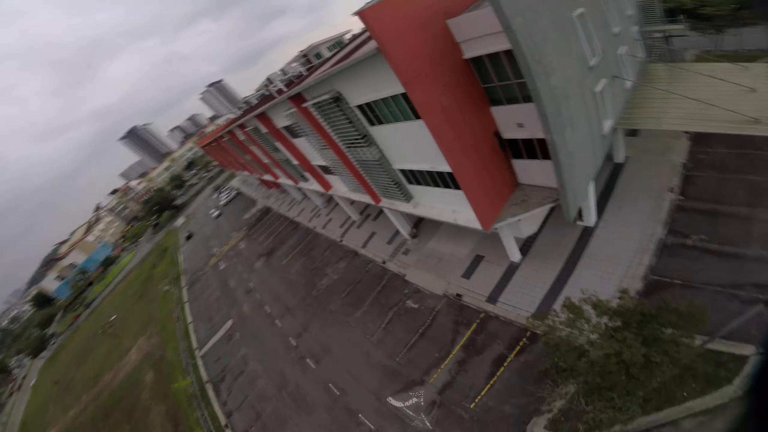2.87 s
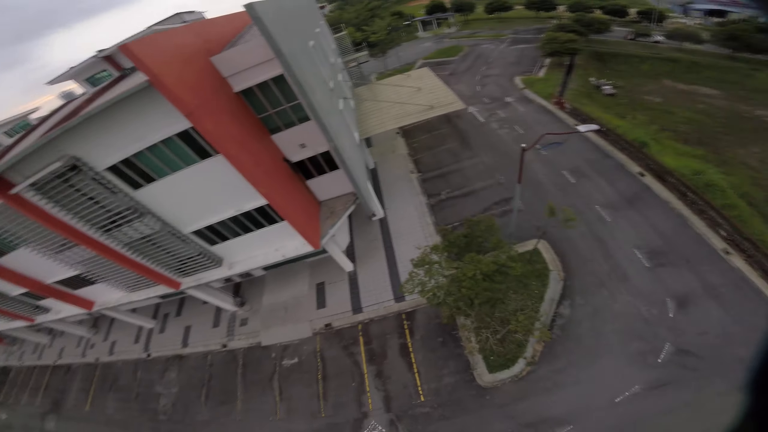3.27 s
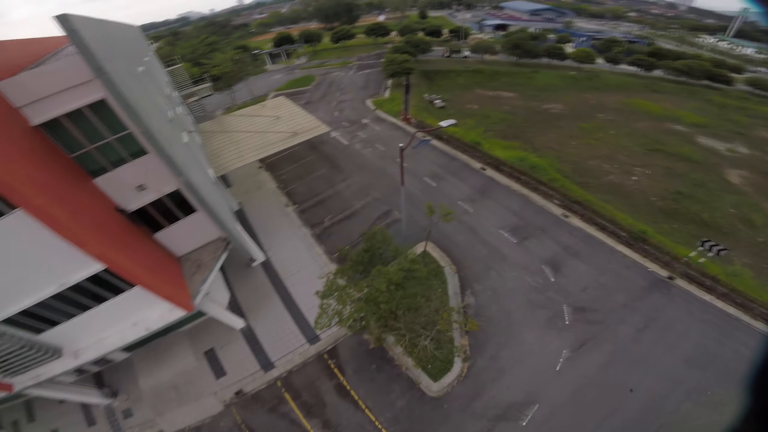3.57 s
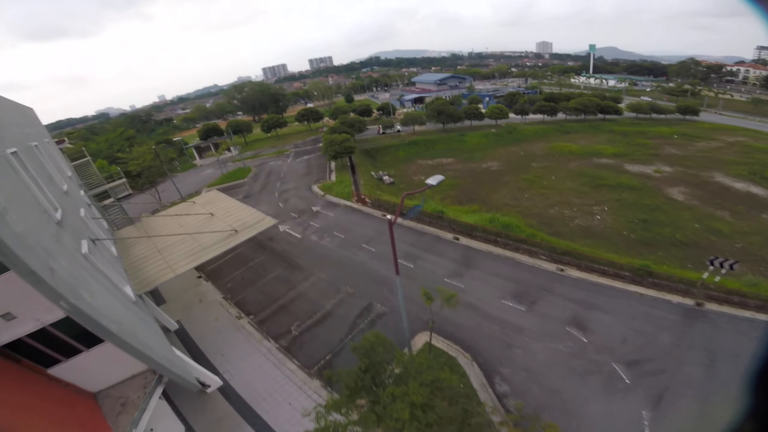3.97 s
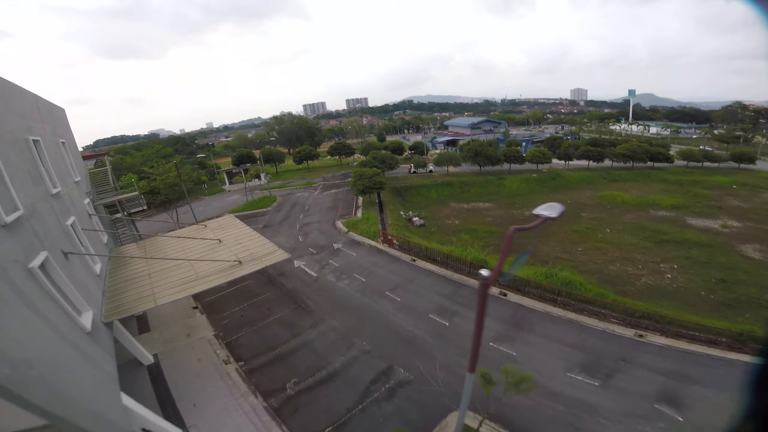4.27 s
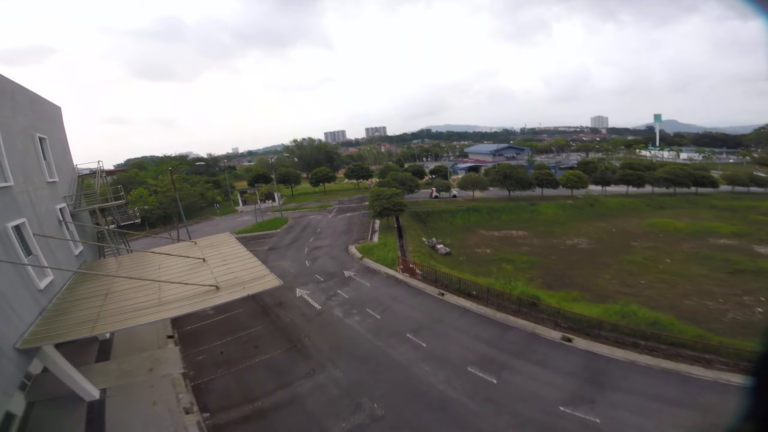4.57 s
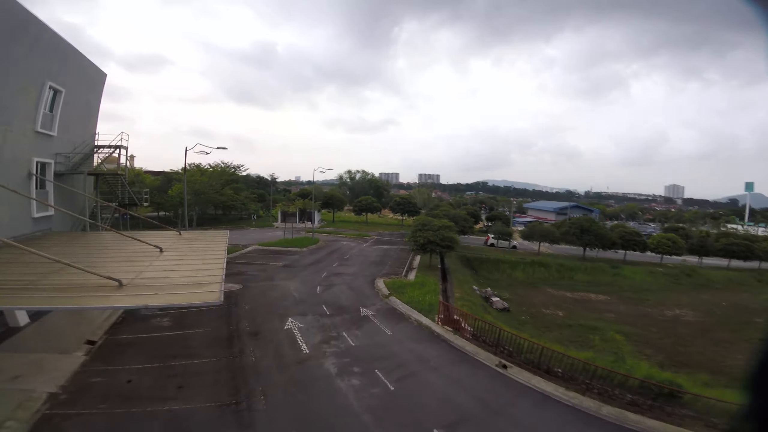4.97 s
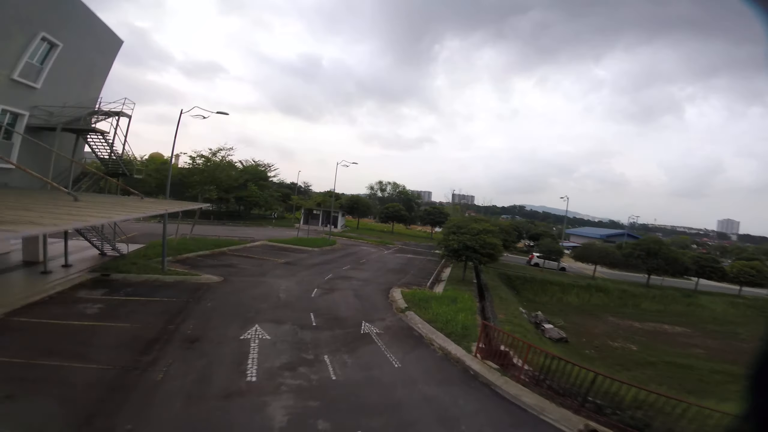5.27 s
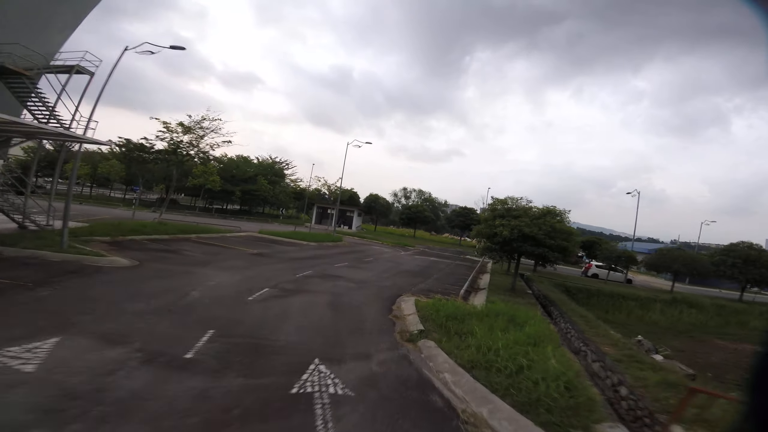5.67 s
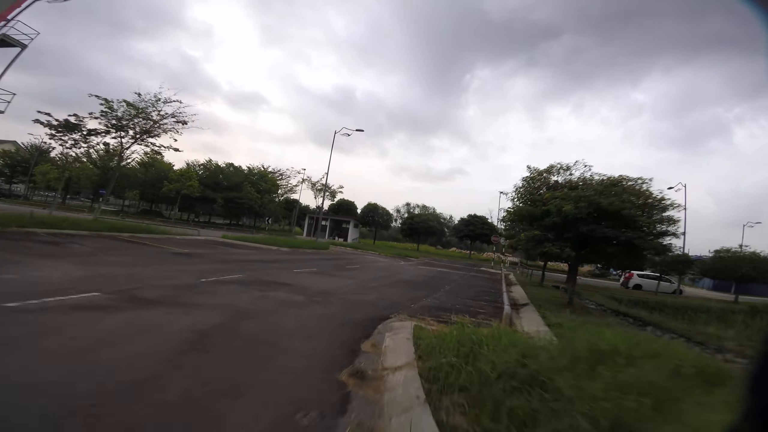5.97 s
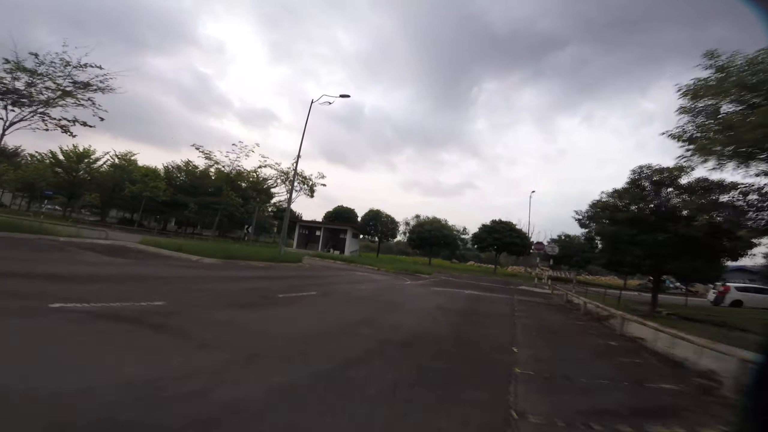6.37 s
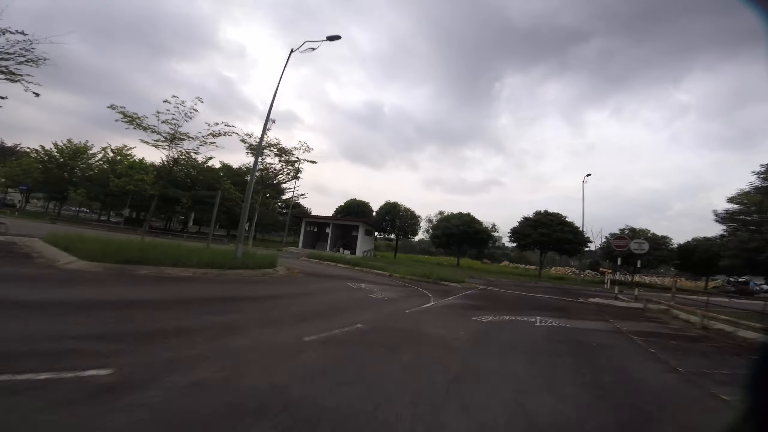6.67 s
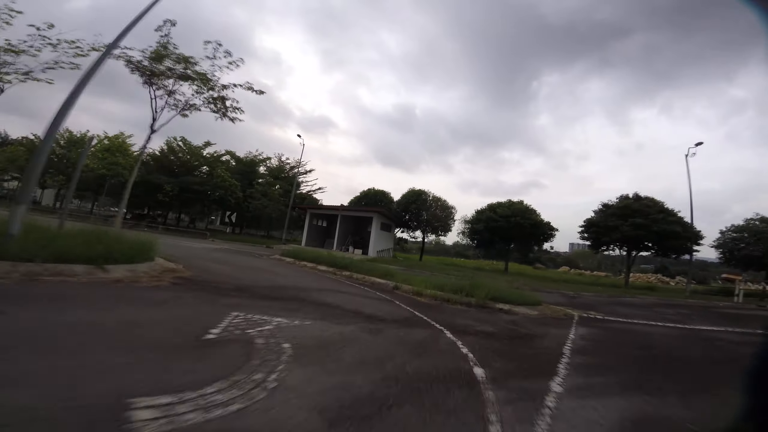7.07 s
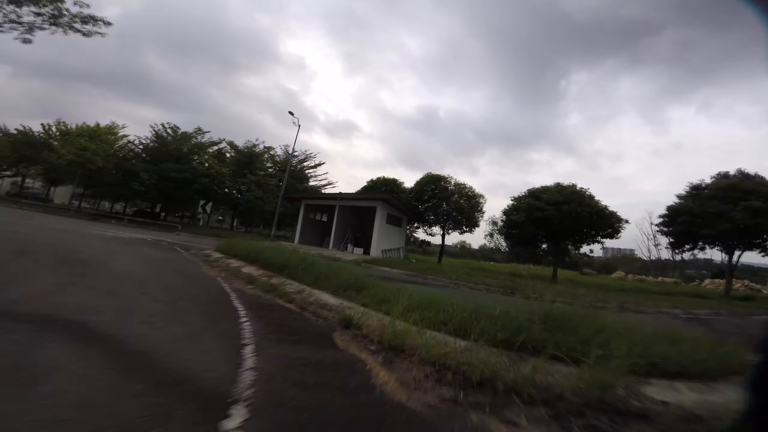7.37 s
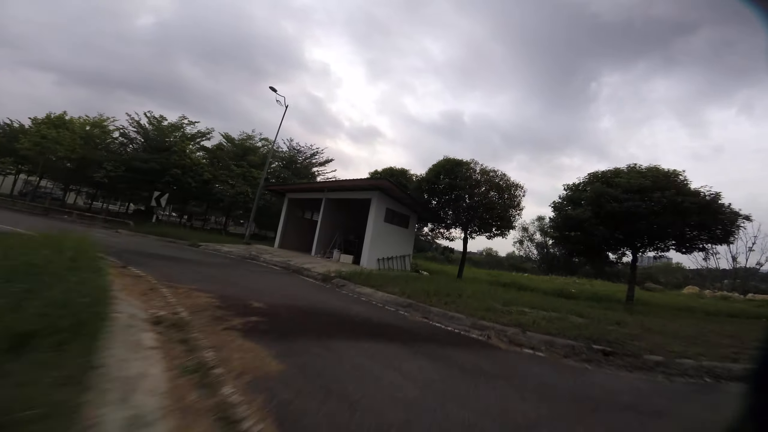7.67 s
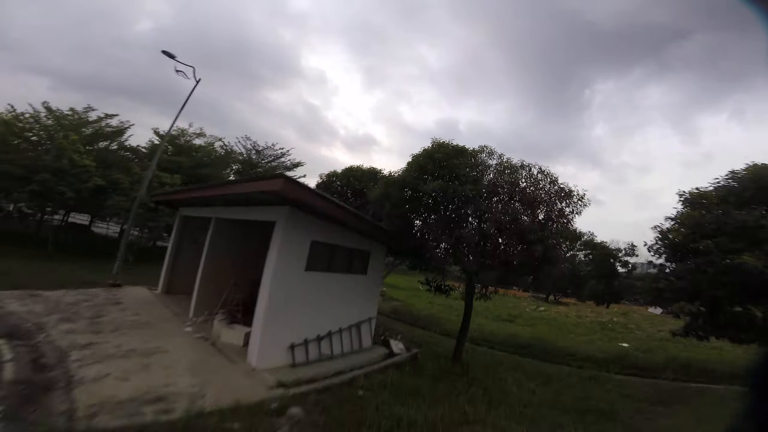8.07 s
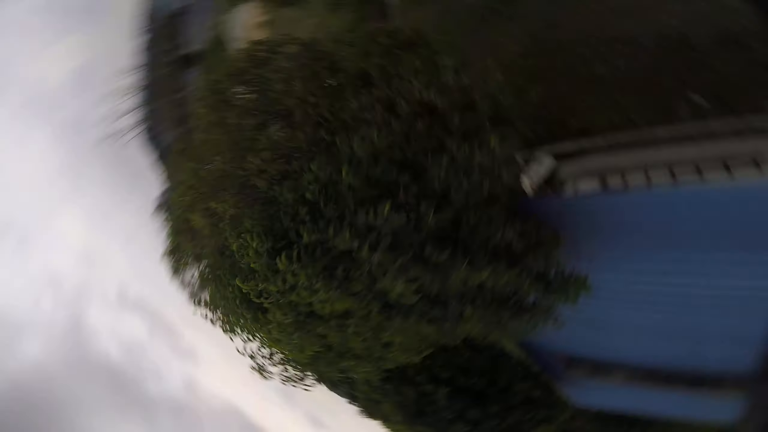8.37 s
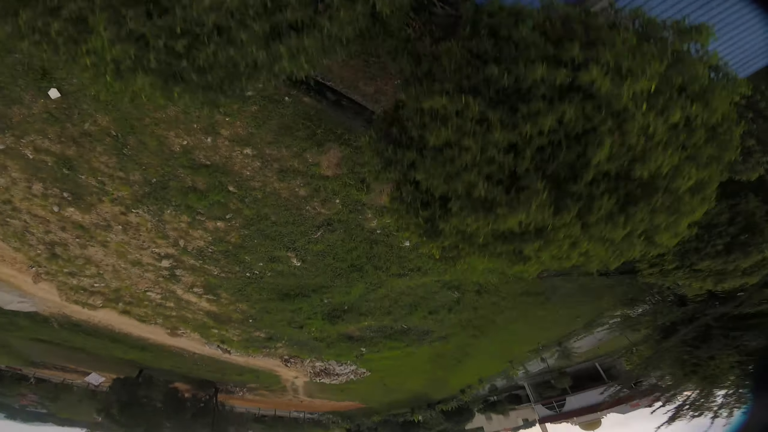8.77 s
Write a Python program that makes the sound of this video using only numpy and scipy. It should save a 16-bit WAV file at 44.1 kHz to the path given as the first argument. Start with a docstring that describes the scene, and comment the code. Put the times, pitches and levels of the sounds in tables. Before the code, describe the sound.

A small racing drone's motors whine and throb up close, swooping up and down in pitch with wind rumbling on the microphone.

```python
"""Open air, close to the ground, on board a small racing quadcopter flying fast. The microphone is
in the camera bolted to the frame, centimetres from the motors: mono, in the wind, peaks limited.
Four three-bladed rotors shake the frame and chop the air; two of nearly equal speed beat against
each other. Near the end a burst of throttle is cut for a roll; the motors idle and pick up again."""
import sys
import numpy as np
from scipy import signal
from scipy.fft import rfft, irfft, next_fast_len
from scipy.io import wavfile
from scipy.ndimage import uniform_filter1d, minimum_filter1d

SR = 44100
rng = np.random.default_rng(int(sys.argv[2]) if len(sys.argv) > 2 else 0)


def generate_wav(sig):
    """Save sig (samples, or channels by samples) to the path in sys.argv[1] as 16-bit PCM at SR."""
    pcm = np.round(np.clip(np.atleast_2d(sig).T, -1, 1) * 32767).astype(np.int16)
    wavfile.write(sys.argv[1], SR, pcm)


N = 393813
TIME = np.arange(N) / SR
ROLL_START_S, ROLL_END_S, ROLL_BLEND_S = 8.26, 8.82, 0.083

# the throttle, as the speed of the leading pair of rotors: time_s, shaft_hz
SHAFT_SPEED = [(0, 213.9), (.46, 218.8), (.55, 274), (.67, 274), (.78, 291.6), (.89, 266.5), (1, 271.7),
               (1.1, 264.4), (1.23, 214.8), (1.5, 188.9), (1.61, 213.9), (2.12, 227.9), (2.27, 208.8),
               (2.34, 166.3), (2.46, 151.9), (2.6, 181.3), (2.78, 195.7), (2.88, 237.2), (3, 259),
               (3.15, 244.7), (3.4, 251.6), (3.76, 244.4), (3.86, 221.2), (4, 207.4), (4.1, 172.4),
               (4.6, 170.1), (4.85, 180.4), (5.17, 177.1), (5.26, 218), (5.37, 230.8), (5.5, 188.1),
               (5.66, 164.8), (5.9, 230), (6.04, 247), (6.32, 246.1), (6.49, 145.9), (6.82, 142.1),
               (7, 194.8), (7.3, 201.2), (7.6, 241.3), (7.88, 253.4), (8.03, 383.5), (8.12, 433),
               (8.18, 405), (8.25, 217), (8.37, 122.1), (8.56, 281.6), (8.7, 110.9), (8.8, 103.8),
               (8.93, 155)]
# rough speed difference within that pair, heard as throbbing: time_s, beat_hz
BEAT_RATE = [(0, 7), (.6, 9), (1, 15), (1.5, 10), (2.2, 8), (2.75, 12.05), (2.95, 28.3), (3.65, 31),
             (3.85, 4), (4.3, 12), (5.3, 16), (5.95, 9), (6.4, 10), (7.4, 16)]
# moments when the pair throbs deepest: time_s
DEEP_THROB_TIMES = [.047, .163, 0.324, 0.549, 0.774, 1.072, 1.78, 2.111, 2.248, 3.114, 3.308, 3.797, 4.011,
                    5.317, 5.433, 5.738, 6.048, 6.145, 6.252, 6.353, 6.96, 7.341, 7.58, 8.195]
# how churned the air is that the blades meet: time_s, wash_gain_db, blade_gain_db
CHURNED_AIR = [(0, -1.5, -1), (1.4, -2, -1.5), (1.9, -1, 3.5), (2.25, 0.5, 1), (2.4, -2.5, 4), (2.6, -2, 6),
               (2.9, -2, -0.5), (3.3, 4.5, -2.5), (3.55, -3, -4.5), (4.15, -4.5, -9.5), (4.75, 4.5, 4.5),
               (5.17, 4, 5), (5.5, 1, 2.5), (6.28, -5, 0.5), (6.43, -5, -5), (6.7, 0, 1.5), (7.05, 2, 2),
               (8.2, -4, 2.5), (8.78, -0.5, 2), (8.93, -1, 7)]
# swell of the rasp, the tip hiss and the lower magnet whistle: time_s, gain_db
TREBLE_SWELL = [(0, 2), (.4, -1.5), (1.3, -2.5), (2.2, -2), (2.5, -4), (2.9, 1), (3.15, -4), (3.85, -5.5),
                (4.15, -4), (4.5, 2.5), (4.9, 1.5), (5.17, 2.5), (5.3, 4), (5.5, -1), (5.95, 1), (6.43, -6),
                (6.8, 1), (7.8, 0), (8.3, 2), (8.78, -2.5), (8.86, 1.5)]


def amp(db):
    """Decibels to gain."""
    return np.exp(np.asarray(db) * np.log(10) / 20)


def unit_rms(x):
    """Scales a sound to rms 1."""
    return x / np.sqrt(np.mean(x ** 2) + 1e-20)


def curves(rows):
    """Each column after time_s, joined by straight lines in time."""
    time_s, *columns = np.transpose(rows)
    return [np.interp(TIME, time_s, column) for column in columns]


def db_at(spectrum, hz):
    """A spectrum's level at any frequency."""
    freq_hz, db = np.transpose(spectrum)
    return np.interp(np.log(hz + 1), np.log(freq_hz + 1), db)


def coloured(x, spectrum):
    """Filters a sound by a spectrum."""
    size = next_fast_len(N)
    gain = amp(db_at(spectrum, np.fft.rfftfreq(size, 1 / SR)))
    return irfft(rfft(x, size) * gain, size)[:N]


def wander(rate_hz, size=8192):
    """Smooth random drift of rms 1, up to about the given rate."""
    hz = np.fft.rfftfreq(size, N / SR / size)
    slow = irfft(rfft(rng.standard_normal(size)) / (1 + (hz / rate_hz) ** 4))
    return unit_rms(np.interp(TIME, np.linspace(0, N / SR, size), slow))


def wrapped(angle):
    """An angle brought back into one turn."""
    return np.float32(angle % (2 * np.pi))


def shaft_hz(angle):
    """A shaft's turns a second."""
    return abs(np.gradient(angle)) * SR / (2 * np.pi)


def rolling():
    """1 during the roll, 0 in level flight."""
    return np.clip(np.minimum(TIME - ROLL_START_S, ROLL_END_S - TIME) / ROLL_BLEND_S + .5, 0, 1)


def throttle(cruise_hz=200):
    """Octaves above cruising speed."""
    return np.log2(curves(SHAFT_SPEED)[0] / cruise_hz)


def flight_db(base_db, per_octave_db, roll_db=0):
    """A level that follows the throttle and shifts in the roll."""
    return base_db + per_octave_db * throttle() + roll_db * rolling()


def deep_throbs(width_s=0.041):
    """Rises to 1 around each deep throb."""
    nearest_s = np.min([abs(TIME - s) for s in DEEP_THROB_TIMES], axis=0)
    return np.exp(-(nearest_s / width_s) ** 2)


def shaft_angles(hunt=0.00691, steer_hunt=0.00903, lead_share=.15, uneven_turns=.15,
                 idle_hz=69.1, hold_hz=189, sag_hz_per_s=45):
    """Four shafts: a leading pair that slip one turn apart at each beat, and two that lag to steer."""
    # how much slower the steering rotors run than the pair: time_s, third_share, fourth_share
    steering = [(0, .02, 0.13), (.43, .03, 0.12), (.58, 0.015, 0.037), (1.1, 0.1, 0.031),
                (1.3, 0.041, 0.21), (1.8, 0.14, 0.29), (2.2, 0.17, 0.31), (2.34, 0.21, 0.22),
                (2.48, 0.23, 0.24), (2.62, 0.017, .24), (2.78, 0.089, .18), (2.95, 0.088, 0.21),
                (3.8, 0.043, 0.14), (4.15, 0.13, 0.34), (4.6, 0.012, 0.17), (4.85, .11, .2),
                (5.15, .15, .17), (5.3, 0.089, .1), (5.67, 0.05, 0.062), (5.95, 0.014, .03),
                (6.3, 0.029, 0.054), (6.7, -0.068, 0.051), (7.15, 0.098, .12), (7.5, 0.034, 0.048),
                (8.2, .03, .06)]
    third_lag, fourth_lag = curves(steering)
    speed_hz, roll = curves(SHAFT_SPEED)[0], rolling()
    # a whole number of beats fits between two deep throbs
    throb_s = np.r_[-.05, DEEP_THROB_TIMES, N / SR + .05]
    drift = np.interp(throb_s, TIME, np.cumsum(curves(BEAT_RATE)[0]) / SR)
    beats = np.r_[0, np.cumsum(np.maximum(np.round(np.diff(drift)), 1))]
    slip = uniform_filter1d(np.interp(TIME, throb_s, beats), size=600, mode="nearest") + .5
    slip += uneven_turns * (1 - deep_throbs()) * wander(16)
    # in the roll the third rotor holds its speed and slowly sags while the fourth idles
    sagging_hz = hold_hz - sag_hz_per_s * (TIME - ROLL_START_S)
    third_hz = (1 - roll) * speed_hz * (1 - third_lag) + roll * sagging_hz
    fourth_hz = (1 - roll) * speed_hz * (1 - fourth_lag) + roll * idle_hz
    # the flight controller keeps nudging every motor
    pair = np.cumsum(speed_hz * (1 + hunt * wander(36.4))) / SR
    others = [np.cumsum(hz * (1 + steer_hunt * wander(22.32))) / SR for hz in (third_hz, fourth_hz)]
    return 2 * np.pi * np.array([pair + lead_share * slip, pair - (1 - lead_share) * slip, *others])


def frame_hum(angles, beat_depth=0.39, deep_depth=0.81, others_db=-19, roll_top_db=-20, mount_db=-28):
    """Unbalanced propellers shake the frame once a turn, almost as pure tones."""
    # the frame's response, resonant near 250 Hz: shaft_hz, gain_db
    response = [(105, -26), (145, -14.5), (176, -19), (198, -8), (220, -6), (250, -5), (285, -5.5),
                (350, -9.5), (430, -9)]
    # quick beats cut a little deeper
    usual_depth = beat_depth + .006 * (curves(BEAT_RATE)[0] - 10) + 0.12 * wander(20)
    depth = np.clip(usual_depth + (deep_depth - usual_depth) * deep_throbs(), 0, 1)
    pair = (np.sin(angles[0]) + depth * np.sin(angles[1])) / np.sqrt(1 + depth ** 2)
    tremble_db = wander(35)
    frame_db = db_at(response, curves(SHAFT_SPEED)[0])
    # unloaded in the roll, the rotors no longer drive the frame's resonance
    frame_db -= rolling() * np.maximum(frame_db - roll_top_db, 0)
    others = sum(amp(others_db + db_at(response, shaft_hz(a))) * np.sin(a) for a in angles[2:])
    # the idling shaft meets the resonance of the soft camera mount
    mount = amp(mount_db) * rolling() * np.sin(angles[3])
    return np.sqrt(2) * (amp(frame_db + tremble_db) * pair + others + mount)


def blade_tones(angles, rotor_db=(0, -10, -4.5, -2.5), flutter_db=2, bite_hz=265, bite_db_per_octave=17):
    """Each rotor sings a stack led by its third multiple; gusty inflow roughens it."""
    # one rotor's overtones: shaft_multiple, level_db
    overtones = [(1, -9.5), (2, -9), (3, -1), (4, -14), (5, -17.5), (6, -16), (7, -18), (8, -20), (9, -18),
                 (12, -21)]
    # how the camera's case passes them to the microphone: freq_hz, gain_db
    camera_case = [(100, 4), (280, -12), (350, -3.5), (540, -2.5), (720, -5), (1000, -5), (1310, -2.5),
                   (1700, -26), (2250, -20), (2700, -10), (3200, -11), (4200, -24.5)]
    # at full throttle the other overtones grow, the screaming second and sixth most
    bite = amp(bite_db_per_octave * np.maximum(throttle(bite_hz), 0))
    growth_by_order = {2: bite, 3: 1, 6: bite}
    tones = np.zeros(N)
    for angle, gain_db in zip(angles, rotor_db):
        shaken = wrapped(angle + .025 * wander(110))
        stack = np.zeros(N)
        for order, level_db in overtones:
            growth = growth_by_order.get(order, np.sqrt(bite))
            stack += amp(level_db) * growth * np.cos(order * shaken + 2 * np.pi * rng.random())
        tones += stack * amp(gain_db + flutter_db * wander(18))
    blade_db = flight_db(-16, per_octave_db=-6, roll_db=-12) + curves(CHURNED_AIR)[1]
    return amp(blade_db) * coloured(tones, camera_case)


def wind_buffet():
    """Wind buffets the microphone in gusts, hardest in the turns and the roll."""
    # wind on the camera: time_s, gain_db
    gusts = [(0, -7), (.7, 0.5), (1.4, -8), (2.4, 0), (2.7, 0.5), (3, 10.5), (3.25, -7), (4.15, -5.5),
             (4.85, 3.5), (5.2, 4.5), (5.5, -0.5), (6.35, -5), (6.7, 7.5), (7.2, -5.5), (8.4, 8),
             (8.65, 4.5), (8.93, 11)]
    # spectrum of its rumble: freq_hz, density_db
    rumble = [(10, -16.5), (25, -9.5), (52, -5.5), (71, 2), (88, -8.5), (150, -7.5), (300, -2),
              (600, -69.5)]
    level_db = flight_db(-26, per_octave_db=2) + curves(gusts)[0] + wander(6.9)
    return amp(level_db) * unit_rms(coloured(rng.standard_normal(N), rumble))


def blade_turbulence(angles, chop=0.37, dull_cutoff_hz=8000, dull_below_shaft_hz=215):
    """Turbulence off the blades pulses as each one passes, and falls away in the roll."""
    # low propeller wash: freq_hz, density_db
    wash_spectrum = [(60, -24), (110, -10), (160, 5), (330, -11.5), (500, 2.5), (700, 0.5), (900, -3),
                     (1100, -3), (1320, -1.5), (1500, -8), (1700, -35), (2600, -63.5)]
    # blade rasp: freq_hz, density_db
    rasp_spectrum = [(900, -37.5), (1550, 0), (1720, -4.5), (2150, -0.5), (2400, -7.5), (2600, -7),
                     (2980, -1), (3500, -9), (4100, -22), (5200, -63), (7000, -93)]
    # tip hiss: freq_hz, density_db
    hiss_spectrum = [(2500, -19), (4200, -11.5), (5200, -6.5), (6800, -4.5), (8500, -7), (9600, -10),
                     (10600, -18), (11800, -32.5), (15000, -48.5)]
    blade_passes = 1 + chop * np.cos(3 * angles).sum(0) / 2
    pulsing = blade_passes * amp(wander(21))
    wash, rasp, bright_hiss = (unit_rms(coloured(pulsing * rng.standard_normal(N), spectrum))
                               for spectrum in (wash_spectrum, rasp_spectrum, hiss_spectrum))
    # slow blade tips hiss more dully
    lowpass = signal.butter(2, dull_cutoff_hz, fs=SR, output="sos")
    dull_hiss = unit_rms(signal.sosfiltfilt(lowpass, bright_hiss))
    slow = np.clip((dull_below_shaft_hz - curves(SHAFT_SPEED)[0]) / 45, 0, 1)
    hiss = slow * dull_hiss + (1 - slow) * bright_hiss
    wash_db = flight_db(-24, per_octave_db=-6, roll_db=-7) + curves(CHURNED_AIR)[0]
    rasp_db = flight_db(-34, per_octave_db=-1, roll_db=-8) + curves(TREBLE_SWELL)[0]
    hiss_db = flight_db(-46.5, per_octave_db=0.7, roll_db=-11) + curves(TREBLE_SWELL)[0]
    return amp(wash_db) * wash + amp(rasp_db) * rasp + amp(hiss_db) * hiss


def magnet_whine(angles, magnets=14, coil_phases=3, gain_db=3):
    """Magnets passing the coils make two thin whistles when the motors run slowly."""
    # the two resonances of the motor bells that carry the whine: freq_hz, level_db
    motor_bells = [(1000, -68), (1950, -42.5), (2220, -43), (2480, -45), (2750, -66), (4500, -82),
                   (5600, -64), (6200, -61), (7400, -57.5), (7900, -72), (10000, -100)]
    # the lower whistle needs slow blades that pull
    load = (1 - rolling()) * np.clip(-throttle() * 5, 0, 1) * amp(curves(TREBLE_SWELL)[0])
    whine = np.zeros(N)
    for angle in angles:
        shaken = wrapped(angle + .022 * wander(130))
        for order, strength in ((magnets, load), (magnets * coil_phases, 1)):
            resonance = amp(db_at(motor_bells, order * shaft_hz(angle)))
            whine += strength * resonance * np.sin(order * shaken)
    return amp(gain_db) * whine


def braking_jolts(rise_s=0.002):
    """The motors brake hard to stop the roll: a brief squeak and a puff of churned air."""
    # noise bursts of the squeak and the puff: start_s, level_db, centre_hz, width_hz, decay_s
    bursts = [(8.417, -34, 5380, 484.2, 0.0059), (8.422, -32, 7390, 900, 0.0067),
              (8.425, -11.5, 536, 250, 0.041)]
    jolts = np.zeros(N)
    for start_s, level_db, centre_hz, width_hz, decay_s in bursts:
        age_s = np.maximum(TIME - start_s, 0)
        envelope = np.minimum(age_s / rise_s, 1) * np.exp(-age_s / decay_s)
        edges_hz = [centre_hz - width_hz / 2, centre_hz + width_hz / 2]
        bandpass = signal.butter(2, edges_hz, "bandpass", fs=SR, output="sos")
        jolts += amp(level_db) * envelope * unit_rms(signal.sosfilt(bandpass, rng.standard_normal(N)))
    return jolts


def scene():
    """The microphone rides with every source in open air, so there is no room and no passing shift."""
    angles = shaft_angles()
    mix = (frame_hum(angles) + blade_tones(angles) + wind_buffet() + blade_turbulence(angles)
           + magnet_whine(angles) + braking_jolts())
    return mix[None]


def record(dry, ceiling_db=-.8, recover_db_per_s=250, cutoff_hz=15000):
    """The camera's fast limiter flattens the throbs and ducks the air noise; a low-pass follows."""
    over_db = np.maximum(20 * np.log10(abs(dry[0]) + 1e-9) - ceiling_db, 0)
    recovery_db = TIME * recover_db_per_s
    reduction_db = np.maximum.accumulate(over_db + recovery_db) - recovery_db
    held_gain_db = minimum_filter1d(-reduction_db, size=300)
    smooth_gain_db = uniform_filter1d(uniform_filter1d(held_gain_db, size=150), size=120)
    lowpass = signal.firwin(511, cutoff_hz, window=("kaiser", 9), fs=SR)
    return signal.oaconvolve(dry * amp(smooth_gain_db), lowpass[None], "same")


dry = scene()
out = record(dry)
generate_wav(out)
```